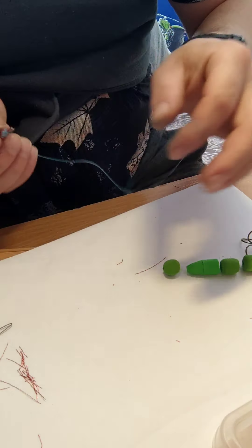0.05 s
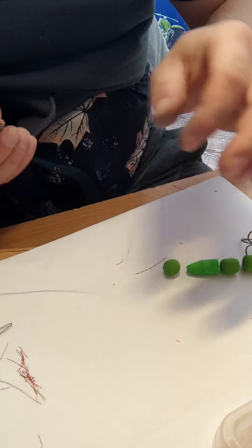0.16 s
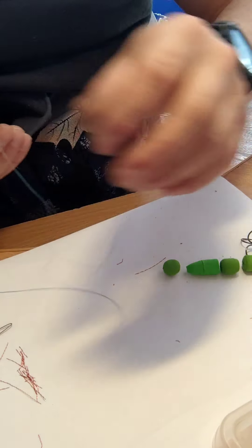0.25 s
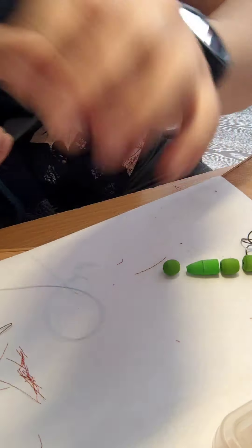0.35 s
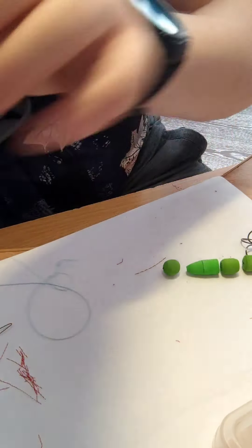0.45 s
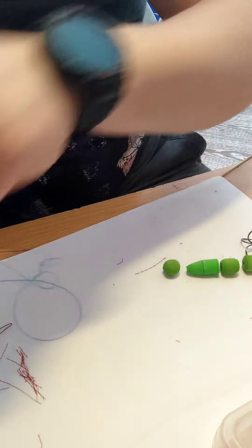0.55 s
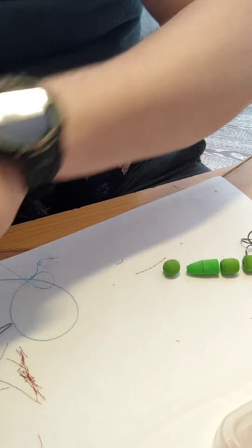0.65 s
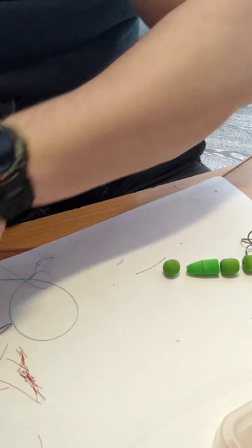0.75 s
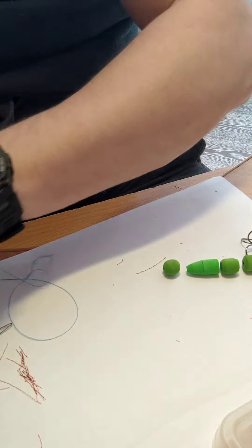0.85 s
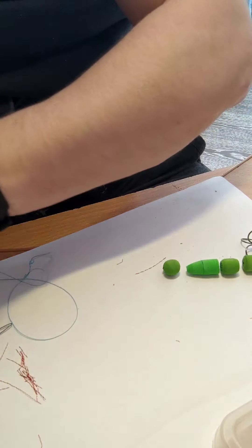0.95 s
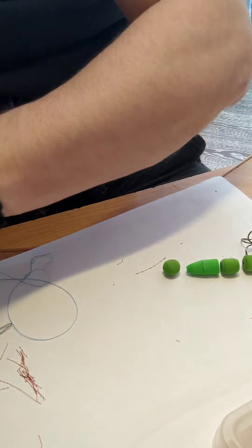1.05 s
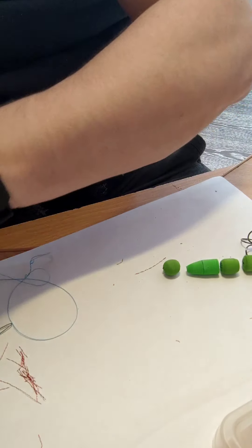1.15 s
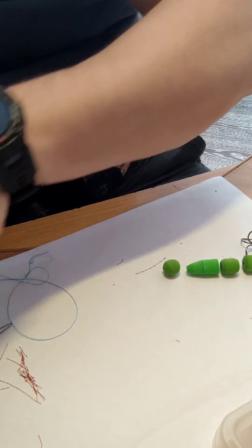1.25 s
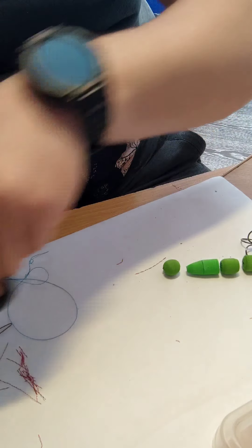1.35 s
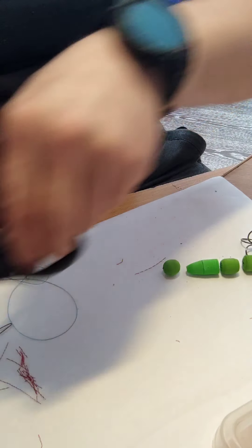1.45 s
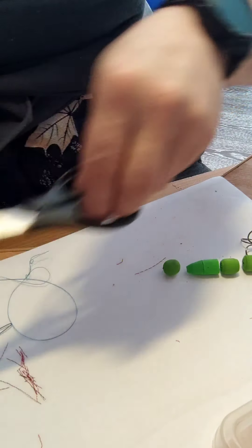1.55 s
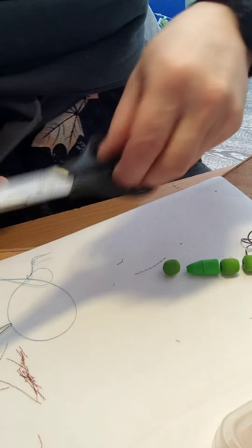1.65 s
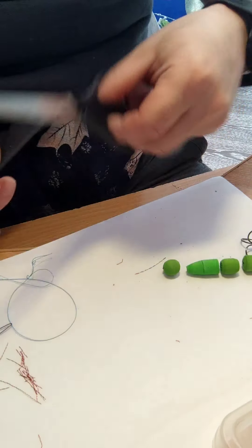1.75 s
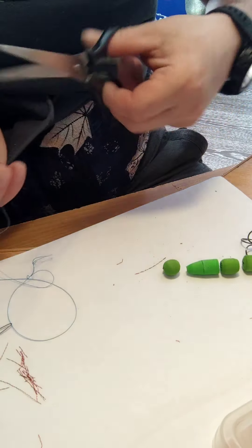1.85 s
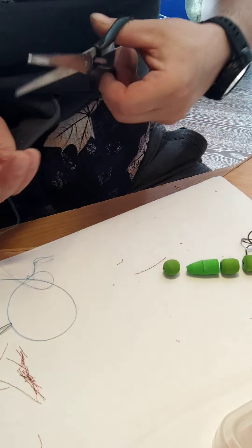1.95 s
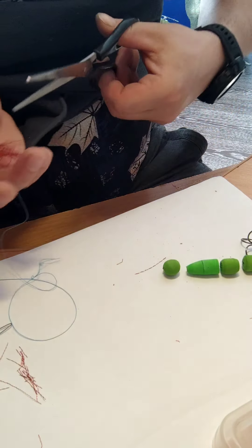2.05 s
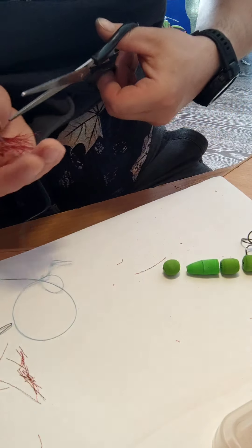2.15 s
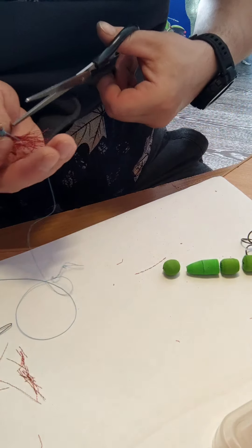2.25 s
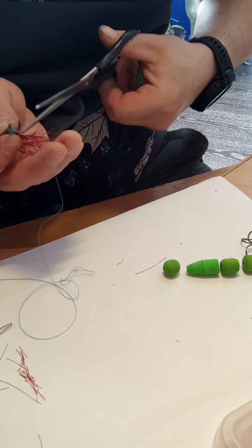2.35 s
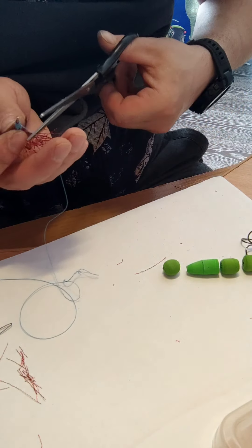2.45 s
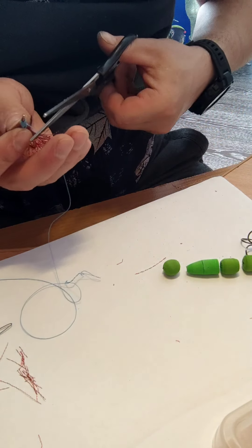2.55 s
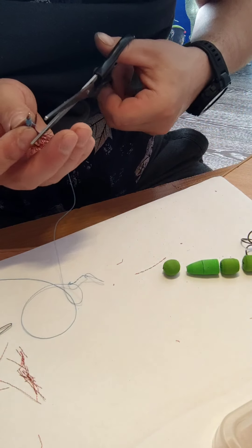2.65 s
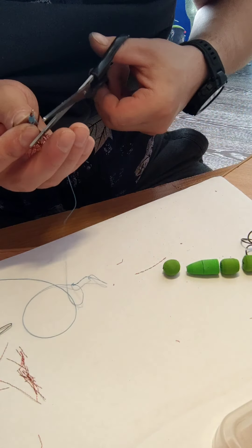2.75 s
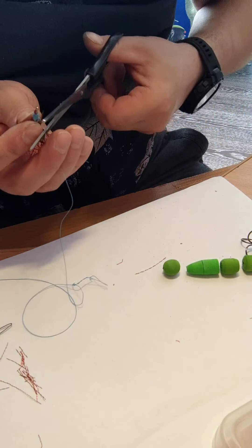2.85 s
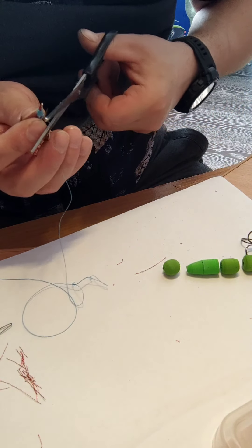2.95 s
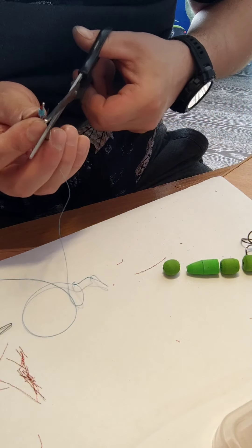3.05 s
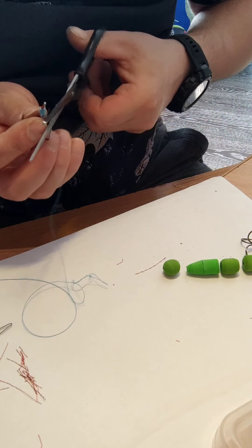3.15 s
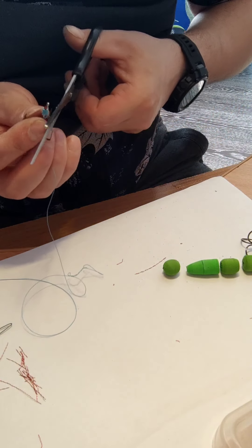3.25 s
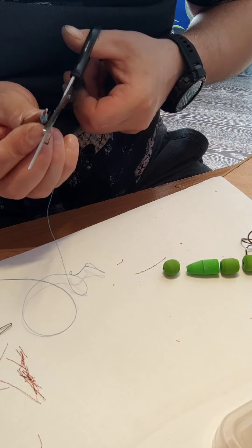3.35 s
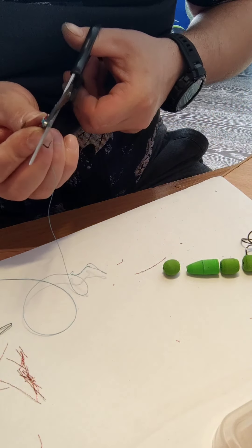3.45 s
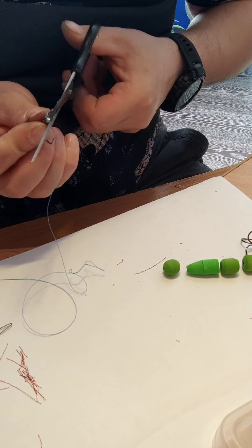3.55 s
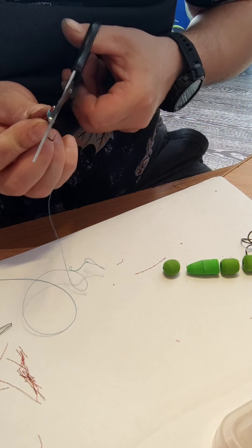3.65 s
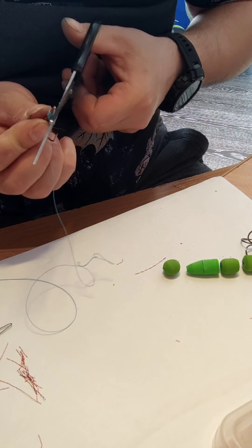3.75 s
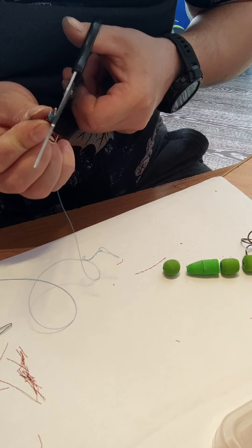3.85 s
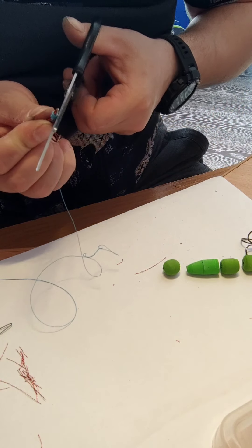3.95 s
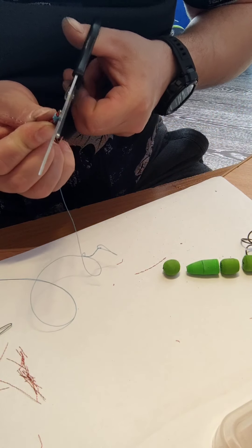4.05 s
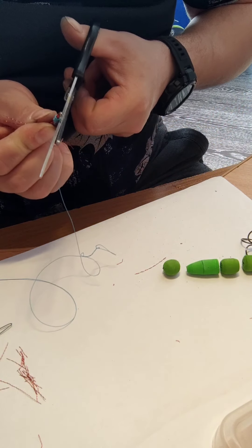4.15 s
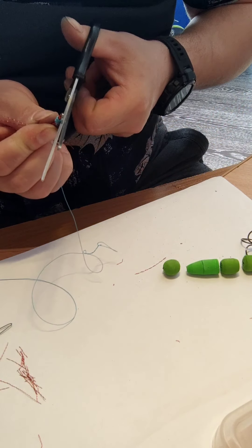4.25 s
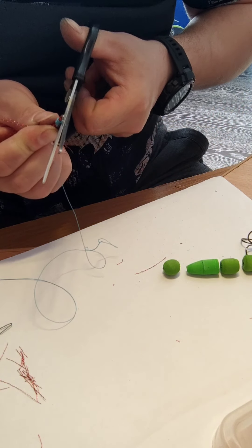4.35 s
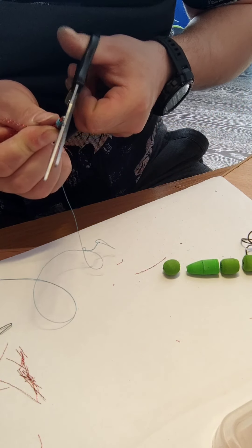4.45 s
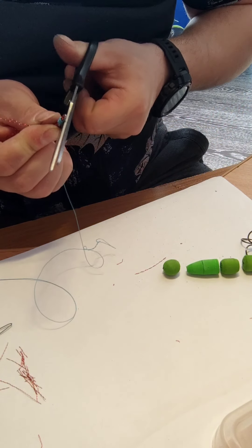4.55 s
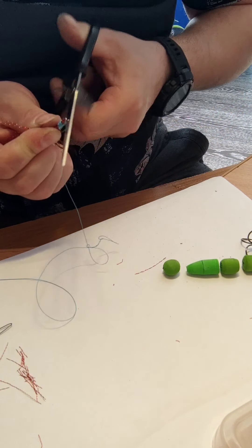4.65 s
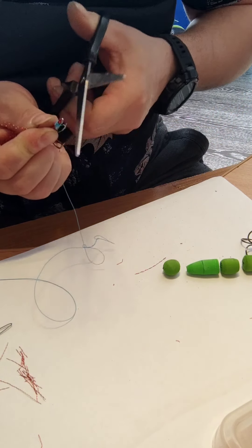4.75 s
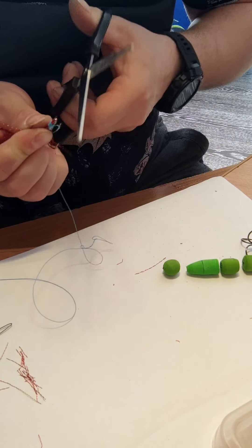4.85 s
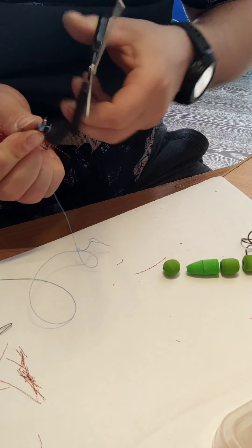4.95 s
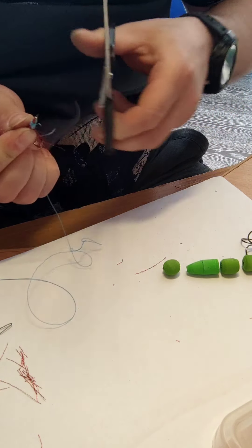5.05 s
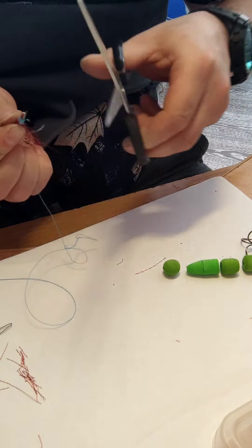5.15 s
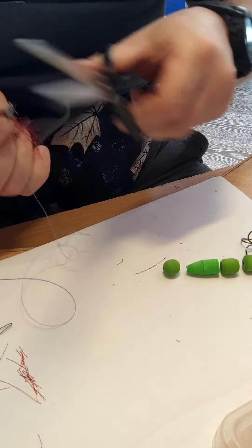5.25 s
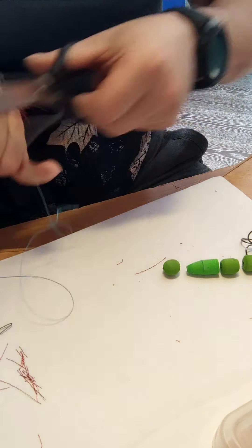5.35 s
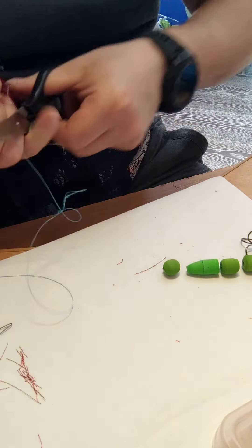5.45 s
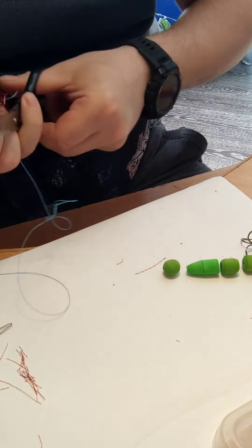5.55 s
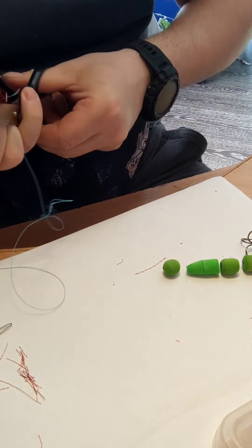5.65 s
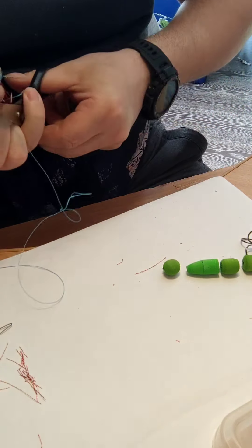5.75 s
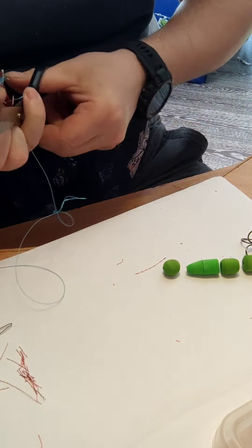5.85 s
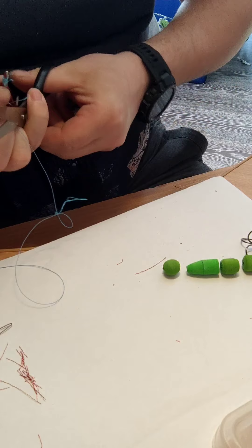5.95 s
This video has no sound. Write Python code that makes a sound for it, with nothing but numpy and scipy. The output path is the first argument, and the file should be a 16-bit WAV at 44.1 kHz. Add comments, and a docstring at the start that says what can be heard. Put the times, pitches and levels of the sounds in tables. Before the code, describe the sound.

Small scissors are picked up from a table: rapid metallic clicks and knocks, a pause, a gritty drag, then dull wooden thumps. Light skin and fabric rustling continues in strokes. Later come sparse, tiny thread snips, denser towards the end, then near quiet. Dry, intimate room with faint hiss and low drone, captured close in bright stereo.

```python
"""Small steel scissors are picked up from a wooden table, knock its top, then snip and pluck at thread.
The scissors are grit bursts and ringing blades; knocks ring damped modes of table and handles.
Snips are short gritty bursts; skin and cloth rustle as grainy noise over a quiet room's hush and drone.
Two microphone ports each add their own treble resonance."""
import sys
import numpy as np
from scipy import signal
from scipy.fft import rfft, irfft, next_fast_len
from scipy.io import wavfile
from scipy.ndimage import uniform_filter1d, map_coordinates

SR = 44100
rng = np.random.default_rng(int(sys.argv[2]) if len(sys.argv) > 2 else 0)


def master(y):
    """Save y as 16-bit WAV."""
    cut = np.clip(np.atleast_2d(y).T, -1, 1)
    pcm = np.round(cut * 32767)  # scale
    wavfile.write(sys.argv[1], SR, pcm.astype(np.int16))


N = 264540


def amp(db):
    """Decibels to linear gain."""
    return 10 ** (np.asarray(db) / 20)


def unit(x):
    """Scales a signal to an rms of 1."""
    return x / np.sqrt(np.mean(x ** 2) + 1e-20)


def along(points, hz):
    """Reads a curve of (Hz, value) points on a log frequency axis."""
    point_hz, values = np.transpose(points)
    return np.interp(np.log(hz + 1), np.log(point_hz + 1), values)


def filtered(x, response):
    """Filters x with a complex response given as a function of frequency."""
    size = next_fast_len(N + SR // 2)
    spectrum = rfft(x, size) * response(np.fft.rfftfreq(size, 1 / SR))
    return irfft(spectrum, size)[..., :N]


def peak(f, hz, width):
    """Response of a causal resonance whose top is 1."""
    return 1j * f * width / (hz * hz - f * f + 1j * f * width)


def lagging(lag_s):
    """Response that delays the right side only."""
    return lambda f: np.exp(-2j * np.pi * f * np.array([[0], [lag_s]]))


def sides(pan_db):
    """Left and right gains for a left-minus-right level difference."""
    return amp(np.array([pan_db, -pan_db]) / 2)


def add(track, start_s, sound):
    """Mixes a sound into a stereo track."""
    track[:, round(start_s * SR):][:, :sound.shape[1]] += sound


def bands(low, middle, high, low_hz):
    """Keeps each layer to its own range and sums them."""
    low = filtered(low, lambda f: peak(f, low_hz, 1670) ** 2)
    middle = filtered(middle, lambda f: peak(f, 4720, 4040) ** 2)
    high = filtered(high, lambda f: peak(f, 8960, 9560) ** 2)
    return low + middle + high


def ringing(modes, t, scatter_db):
    """Sums damped modes, each struck at a new random strength."""
    total = 0
    for hz, level_db, t60 in modes:
        strike_db = level_db + scatter_db * rng.standard_normal()
        total = total + amp(strike_db - 60 * t / t60) * np.sin(2 * np.pi * hz * t)
    return total


def burst(t, rise_s, t60_s, clumpy_db):
    """A stereo cluster of tiny slips under a rounded rise and an exponential fall."""
    attack = np.sin(np.pi / 2 * np.clip(t / max(rise_s, 1e-4), 0, 1)) ** 2
    decay = amp(-60 * np.clip(t - rise_s, 0, 1) / max(t60_s, 1e-3))
    # the grit level steps every 16 samples
    clumps = np.repeat(rng.standard_normal(len(t) // 16 + 1), 16)[:len(t)]
    grit = rng.standard_normal((3, len(t)))
    shared_and_wide = grit[0] + 1.4 * grit[1:]
    return attack * decay * unit(amp(clumpy_db * clumps) * shared_and_wide)


def hush():
    """Room noise and wavering drone bands, with a left-right likeness that varies with frequency."""
    # spectral shape of the room hush: hz [Hz], relative_level_db [dB]
    air_shape = [(6, -2.5), (20, -8), (50, -17.5), (90, -23), (320, -28), (450, -34), (1000, -37.5),
                 (2000, -45), (4000, -45.5), (7000, -49), (10000, -57), (14000, -52)]
    # wavering drone: centre_hz [Hz], width_hz of each of two filter passes [Hz], level_db [dB rms]
    drone = [(115.2, 14, -70), (150, 33, -73.5), (200.2, 26.6, -68.5), (249.3, 73, -70), (836, 99, -83.5)]
    # left-right likeness: hz [Hz], correlation [-1 to 1]
    likeness = [(60, 0.2), (180, 0.88), (540, -0.03), (1640, 0.11), (4930, -0.11), (14800, 0.01)]

    def mid_side(f):
        angle = np.arccos(np.clip(along(likeness, f), -1, 1)) / 2
        return np.array([np.cos(angle), np.sin(angle)])

    mid, side = filtered(rng.standard_normal((2, N)), mid_side)
    pair = np.array([mid + side, mid - side])
    total = amp(-52.0) * unit(filtered(pair, lambda f: amp(along(air_shape, f))))
    for hz, width, level_db in drone:
        total = total + amp(level_db) * unit(filtered(pair, lambda f: peak(f, hz, width) ** 2))
    return total


def strokes():
    """Stereo gains of the fine, middle and dull parts: each stroke swells, holds and fades."""
    # sliding skin and cloth: start_s [s], length_s [s], level_db [dB before band gains],
    # middle_db and dull_db [dB over the fine part], pan_db [dB, left minus right]
    slides = [(0.0, 0.33, -66, -14.5, -17, 2), (0.208, 0.3, -64, -14, -13.5, -1),
              (0.35, 0.49, -59, -10.5, -21, -1), (0.936, 0.16, -64, -3.5, -3, 3),
              (1.122, 0.14, -66.5, -8, -10.5, -3.5), (1.294, 0.19, -68.5, -11.5, -8, 0),
              (1.577, 0.18, -64, -10, -15, 2), (1.679, 0.076, -62, -5, -4, 1),
              (1.834, 0.27, -58, -12.5, -12, 2), (2.02, 0.53, -58, -15.5, -29, -1.5),
              (2.26, 0.1, -54.5, -22.5, -36, -7.5), (2.386, 0.14, -60.5, -15.5, -34, -4),
              (2.658, 0.13, -75.5, 2, -1, 1.5), (2.832, 0.11, -66, -16, -29, -5),
              (3.705, 0.32, -63, -15, -16, 3), (4.364, 0.12, -78, -24, -9, 1),
              (4.508, 0.14, -56, -15, -15, 1), (4.65, 0.15, -60.5, -11, -13.5, 4),
              (4.985, 0.31, -64.5, -16, -11.5, 1), (5.307, 0.15, -53, -14.5, -18, -0.5),
              (5.393, 0.24, -73.5, -1, -1, 2), (5.61, 0.25, -59, -10.5, -18, -2.5)]
    rise_share, fall_share = 0.19, 0.57  # shares of a stroke's length
    rest_db, rest_middle_db, rest_dull_db = -71.5, -13, -11.5  # hands never lie quite still
    t = np.arange(N) / SR
    rest_gains = amp(rest_db + np.array([0, rest_middle_db, rest_dull_db]))[:, None, None]
    power = rest_gains ** 2 * np.ones((2, N))
    for start_s, length_s, level_db, middle_db, dull_db, pan_db in slides:
        progress = (t - start_s) / length_s
        shape = np.clip(np.minimum(progress / rise_share, (1 - progress) / fall_share), 0, 1)
        gains = amp(level_db + np.array([0, middle_db, dull_db]))[:, None, None]
        power = power + (gains * sides(pan_db)[:, None] * shape) ** 2
    return np.sqrt(power)


def rustle():
    """Countless fibre slips: noise with uneven grains, a few sharp ones, and a colour drifting in patches."""
    fine, middle, dull = strokes()
    patch_db = 2.2  # depth of the colour patches
    z = signal.stft(rng.standard_normal((2, N)), nperseg=512)[2]
    # smooth the patches over 8 frequency bins and 10 time frames
    field = uniform_filter1d(rng.standard_normal(z.shape[1:]), 8, 0)
    field = uniform_filter1d(field, 10, 1)
    patchy = signal.istft(z * amp(patch_db * unit(field)), nperseg=512)[1][:, :N]
    clumps = map_coordinates(rng.standard_normal(N // 200 + 4), [np.arange(N) / 200])
    # about 1 ms per snag
    snags = np.repeat(rng.exponential(size=N // 44 + 1), 44)[:N]
    slips = unit(patchy * amp(1.4 * clumps + 1.0 * snags))
    return bands(amp(17) * dull * slips, amp(16.5) * middle * slips, amp(-1.5) * fine * slips, low_hz=2610)


def room(x):
    """The room answers with a diffuse noise tail in which each frequency dies at its own speed."""
    # decay of the room: hz [Hz], t60_s [s]
    decay = [(200, 0.25), (2000, 0.14), (10000, 0.082)]
    hz, t, z = signal.stft(rng.standard_normal((2, SR // 2)), SR, nperseg=256)
    fading = z * amp(-60 * t / along(decay, hz)[:, None])
    tail = signal.istft(fading, SR, nperseg=256)[1]
    # the answer starts 200 samples late
    delayed = np.pad(x, ((0, 0), (200, 0)))
    return signal.fftconvolve(delayed, tail / np.linalg.norm(tail[0]), axes=1)[:, :N]


def ticks():
    """A small contact of blade, nail or thread is a short gritty burst; faint ones fall at random."""
    # clearest contacts: start_s [s], level_db [dB, near the peak before band filters],
    # dullness_db [dB added to the lower parts], rise_s [s], pan_db [dB, left minus right]
    contacts = [(0.229, -27, -28, 0.002, -1), (0.3795, -22, -12, 0.0014, 0.5), (0.4762, -36, -23, .008, -3),
                (1.3347, -43, 6, 0.013, -4), (1.354, -48, 12, 0.01, -2), (1.8938, -25, 1.5, 0.0043, -1.5),
                (2.721, -56, 14, .006, 5), (3.2976, -46, 3, 0.0092, 0), (3.738, -42, 0, 0.0095, -4),
                (3.771, -28.5, -2, 0.0014, -1), (3.7972, -38, 0, 0.0064, 1), (3.8828, -39, -2, 0.00096, 1),
                (3.8953, -37, 4, 0.0071, 3), (3.997, -53, -2, .002, 0), (4.168, -52, -4, .002, 6),
                (4.2434, -46, 2, 0.0043, 1), (4.2728, -41, -4, 0.0029, 0), (4.3335, -46, -3, .003, 8),
                (4.394, -43, -3, .0015, -2), (4.4, -39, -2, 0.0064, 7), (4.4597, -44.5, -1, .007, 16),
                (4.523, -32, 0, .0014, 2), (4.5336, -31, 1, 0.0073, 4), (4.6082, -31.5, 1.5, 0.002, 4.5),
                (4.629, -43, 6, .003, 4), (4.665, -43, 0, .003, -8), (4.6841, -31.5, 0.5, 0.0014, -4),
                (4.721, -40, 7, 0.0079, -1), (4.7356, -38, 4, .009, -3), (4.9566, -42.5, -1, .008, 10),
                (4.997, -39, 0, 0.0012, -3), (5.0378, -33, -1, 0.0011, 2), (5.0729, -30.5, 0.5, .0007, 1),
                (5.093, -39, 6, 0.0047, 2), (5.114, -37.5, 0, .0015, -6), (5.1368, -37, 3, .005, 3),
                (5.15, -42, 3, 0.0055, -2), (5.1633, -41.5, 1, 0.0062, -1), (5.3, -44.5, 10, 0.0052, 5),
                (5.322, -37.5, 2, 0.0094, -3), (5.809, -50, 3, 0.0061, 7)]
    low_part_db, middle_part_db = -12, -4.5  # at a dullness of 0
    shortest_t60_s, t60_per_rise = 0.037, 3.4  # a slower rise dies more slowly
    faint_db, faint_spread_db, faint_rise_s = -55, 2, .003
    snap_db, snap_rise_s, snap_t60_s = -1.5, 0.002, 0.0038  # extra crack at the top of a quick tick
    low, middle, high = np.zeros((3, 2, N + SR))
    t = np.arange(SR // 8) / SR
    faint = []
    for when, strength, place in rng.random(size=(24, 3)):
        level_db = faint_db - faint_spread_db * np.log(strength + 1e-3)
        faint.append((when * N / SR, level_db, 0, faint_rise_s, 12 * (place - .5)))
    for start_s, level_db, dullness_db, rise_s, pan_db in contacts + faint:
        grit = burst(t, rise_s, shortest_t60_s + t60_per_rise * rise_s, clumpy_db=2.5)
        sound = sides(pan_db)[:, None] * amp(level_db - 13.5) * grit
        # the quicker the contact, the more it snaps
        snap = amp(snap_db) * np.exp(-rise_s / snap_rise_s) * amp(-60 * np.abs(t - rise_s) / snap_t60_s)
        sound = sound * (1 + snap)
        add(high, start_s, sound)
        add(middle, start_s, amp(middle_part_db + dullness_db) * sound)
        add(low, start_s, amp(low_part_db + dullness_db) * sound)
    return bands(low, middle, high, low_hz=1490)


def knocks():
    """A soft blow, duller the longer the contact, rings plate and handles and rocks the whole table."""
    # handles rapping the table: start_s [s], plate_db, boom_db, large_loop_db, small_loop_db [dB],
    # contact_s [s]
    handle_raps = [(0.871, -49, -44.5, -60, -37.5, 0.00075), (0.893, -37, -40.5, -62, -49, 0.00076),
                   (0.9041, -43, -37.5, -60, -31, 0.00064), (0.918, -43.5, -46, -52, -35.5, 0.00054),
                   (1.073, -43, -50, -46.5, -51, .0002), (1.5, -42, -53, -52, -54, 0.00053),
                   (1.513, -30, -61, -38, -48, 0.00043), (1.536, -39, -57, -38.5, -47, 0.00037),
                   (1.55, -44, -52.5, -39.5, -49, 0.00032), (1.565, -37, -72, -54, -67, 0.0007),
                   (1.579, -37, -57, -51, -68, 0.00092)]
    # soft thumps on the table: start_s [s], plate_db [dB], upper_db [dB over the plate], boom_db [dB],
    # handles_db [dB], contact_s [s], free [share of free ring time]
    soft_thumps = [(1.696, -39, 2, -40, -62, 0.00068, .4), (1.702, -40.5, 17, -38, -52, .0006, 0.35),
                   (1.7083, -29.5, 8.5, -39.5, -60, .001, .45),
                   (1.778, -21, -6.5, -50.5, -39.5, 0.00093, 0.34), (1.787, -39, -6, -57, -60, .0009, 0.13),
                   (1.8506, -27, 2, -58, -44, 0.0012, 0.52), (1.859, -37, 3.5, -50.5, -59, 0.00068, 0.49),
                   (1.895, -30.5, 3, -55, -54, 0.00082, 0.64), (1.906, -34, -12, -64, -65, 0.0014, 1),
                   (1.949, -35, 2, -57, -58, 0.0013, 0.74), (1.979, -38.5, -4, -55.5, -60, 0.00084, 0.86),
                   (2.009, -48, 4.5, -61, -70, .0016, 0.92)]
    # modes, all as hz [Hz], level_db [dB, relative], t60_s [s, ringing freely]:
    # lowest of the table top, upper of the table top, large handle loop, small handle loop
    plate_modes, upper_modes = [(167, 0.5, 0.044), (293.5, 3, 0.083)], [(363, 3.5, 0.051), (457, -5, 0.065), (510, -2.5, 0.066),
                                               (615, -16, 0.044), (740, -14.5, 0.08), (876, -29, 0.015)]
    large_modes, small_modes = [(1100, 5, 0.13), (1930, -6, 0.05), (2950, 1, 0.073)], [(1157, -0.5, 0.096), (1381, 0, 0.11),
                                                    (1565, -0.2, 0.08)]
    # whole table on its legs: hz [Hz], level_db [dB, relative], t60_s [s]
    leg_modes = [(76, -2, 0.2), (118.5, 6, 0.24)]
    rap_upper_db, rap_free, rap_pan_db = -18, 0.55, 9  # upper modes, share of free ring time, L-R
    thump_large_db, thump_pan_db = -1.5, 8.5  # large loop over the small one, L-R
    strike_db = 1.2  # spread of mode strengths from knock to knock
    right_lag_s = 0.00042  # a knock reaches the right port later
    top, legs = np.zeros((2, 2, N + SR))
    t = np.arange(SR // 3) / SR

    def held(modes, level_db, free):
        # a resting hand shortens the ring
        damped = [(hz, db + level_db, t60 * max(free, .05)) for hz, db, t60 in modes]
        return ringing(damped, t, strike_db)

    blows = [(s, plate, rap_upper_db, boom, large, small, contact, rap_free, rap_pan_db)
             for s, plate, boom, large, small, contact in handle_raps]
    blows += [(s, plate, upper, boom, handles + thump_large_db, handles, contact, free, thump_pan_db)
              for s, plate, upper, boom, handles, contact, free in soft_thumps]
    for start_s, plate_db, upper_db, boom_db, large_db, small_db, contact_s, free, pan_db in blows:
        force = np.sin(np.pi * np.clip(t[:SR // 100] / max(contact_s, 1e-4), 0, 1)) ** 2
        plate = held(plate_modes, plate_db, free) + held(upper_modes, plate_db + upper_db, free)
        # the plate first moves away from the microphone
        plate = -plate * (1 - np.exp(-t / 0.0031))
        handles = held(large_modes, large_db, free) + held(small_modes, small_db, free)
        struck = np.convolve(plate + handles, force / force.sum())
        add(top, start_s, sides(pan_db)[:, None] * struck)
        boom = ringing(leg_modes, t, strike_db)[None] * (1 - np.exp(-t / 0.0022))
        add(legs, start_s, -amp(boom_db) * boom)
    # a small plate radiates little bass
    thin = filtered(top, lambda f: (1j * f / (150 + 1j * f)) ** 2)
    return filtered(thin, lagging(right_lag_s)) + legs[:, :N]


def clatter():
    """The scissors scuff the table in gritty bursts; each scuff shakes the blades into ringing."""
    # scissors grabbed, then dragged off the table: start_s [s], level_db [dB before band filters],
    # low_db and middle_db [dB over the high part], blade_db [dB, relative ring], rise_s [s],
    # pan_db [dB, left minus right]
    scuffs = [(0.8693, -33.5, 13, 12, -9, 0.0028, 3), (0.882, -35.5, 13.5, 9, -3, 0.0061, -2),
              (0.9038, -27, 3, 2.5, 1.5, 0.0012, 17), (0.906, -13, -1, -20, -4.5, 0.0027, -1.5),
              (.912, -18.5, 2, 5.5, -1.5, 0.00073, 2), (0.924, -34.5, 14, -3, -24, 0.0041, -2),
              (0.935, -33, 1.5, 4, -10, 0.0046, -5), (0.994, -41, 3, 8, -20, 0.005, -9),
              (1.002, -17.5, -17, -8, -14.5, 0.0055, -0.5), (1.014, -33.5, 7, 2.5, -29, .004, 2),
              (1.071, -30, 17, 15.5, -41, 0.0013, 3), (1.475, -36, 0, 0, -15, 0.008, 5),
              (1.489, -32.5, -5, -2, -26, 0.011, -1), (1.497, -33, 8, 5, -22, 0.012, 3),
              (1.512, -32.5, 10, 0, -32, 0.0077, -7.5), (1.526, -31, 6, 7, -20, 0.0094, 2),
              (1.537, -32.5, 1.5, 3, -17, .0055, -10), (1.5517, -16.5, -8, -1.5, -26, 0.00086, -1.5),
              (1.563, -30, 3, 3, -20, 0.0042, -3), (1.567, -22.5, -13, 1, -24, .0011, 1),
              (1.572, -28, 2, -3, -19, .0012, 7)]
    # modes of the steel blades: hz [Hz], level_db [dB, relative], t60_s [s]
    blade_modes = [(2980, 2, 0.0085), (4620, 0.5, 0.021), (6800, -28, .03), (7840, -11.5, 0.087),
                   (9760, -5.5, 0.024), (11650, -1.5, 0.025), (13430, -6, 0.025)]
    shortest_t60_s, t60_per_rise = 0.035, 4.9  # a slower rise dies more slowly
    low, middle, high, rings = np.zeros((4, 2, N + SR))
    t = np.arange(SR // 8) / SR
    for start_s, level_db, low_db, middle_db, blade_db, rise_s, pan_db in scuffs:
        grit = burst(t, rise_s, shortest_t60_s + t60_per_rise * rise_s, clumpy_db=0.5)
        sound = sides(pan_db)[:, None] * amp(level_db - 13.5) * grit
        add(high, start_s, sound)
        add(middle, start_s, amp(middle_db) * sound)
        add(low, start_s, amp(low_db) * sound)
        blades = amp(blade_db - 19) * ringing(blade_modes, t, scatter_db=4.0)[None]
        add(rings, start_s, signal.fftconvolve(sound, blades, axes=1))
    return bands(low, middle, high, low_hz=1480) + rings[:, :N]


def scene():
    """Contacts with their room answer, over rustle and hush."""
    scuff_lag_s = .00004  # a scuff or tick reaches the right port later
    hits = filtered(ticks() + clatter(), lagging(scuff_lag_s)) + knocks()
    return hits + amp(-13.5) * room(hits) + rustle() + hush()


def record(dry):
    """Each port resonates in the treble; the top end falls away steeply and stops."""
    # port resonances, left then right: hz [Hz], width_hz [Hz], added_db [dB, added to the direct sound]
    port_peaks = [(12000, 1280, 13), (9100, 900, 16)]
    roll_hz, roll_db_per_hz, top_hz = 14230, .07, 15445

    def response(f):
        ports = np.array([1 + amp(db) * peak(f, hz, width) for hz, width, db in port_peaks])
        rolloff = amp(-np.clip(f - roll_hz, 0, SR) * roll_db_per_hz)
        return ports * rolloff * (f < top_hz)

    return filtered(dry, response)


dry = scene()
out = record(dry)
master(out)
```